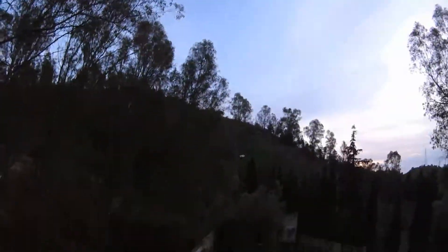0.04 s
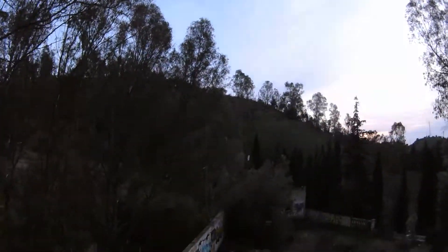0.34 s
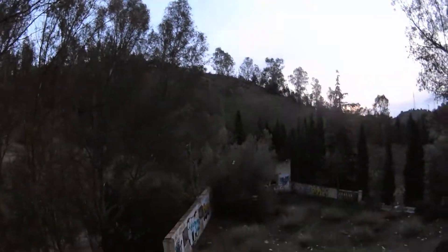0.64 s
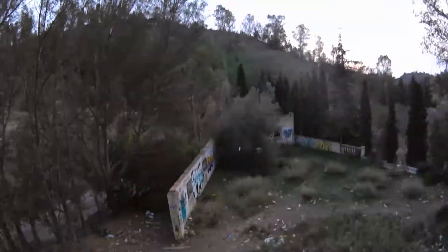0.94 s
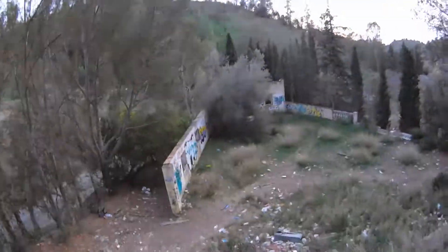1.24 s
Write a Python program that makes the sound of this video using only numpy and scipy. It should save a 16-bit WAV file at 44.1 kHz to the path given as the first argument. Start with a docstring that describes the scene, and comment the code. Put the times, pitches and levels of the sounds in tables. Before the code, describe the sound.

Three thrown glass bottles smash against masonry in a clearing among trees, roughly two seconds apart. Each hit is sharp, short and close enough to overload the microphone, with a quick slap off a far wall and a brief wash from the trees. Pieces thud to the ground, then faint knocks, clinks and gritty crunches follow. Light wind buffets the microphone over a distant hush.

```python
"""Three thrown bottles smash on masonry in a clearing, close enough to overload the microphone.
Each impact excites the modes of the glass and a swarm of fractures, then a bright burst of splinters;
a far wall returns a slap and the trees scatter a short wash. Pieces thud, knock and clink, and grit
crunches. Light wind buffets the microphone over a distant hush, a faint hum and rustling leaves,
and a far bird whistles once near the end."""
import sys
import numpy as np
from scipy import signal
from scipy.fft import rfft, irfft
from scipy.io import wavfile
from scipy.ndimage import uniform_filter1d

SR = 44100
rng = np.random.default_rng(int(sys.argv[2]) if len(sys.argv) > 2 else 0)


def to_wav(sig):
    """Store sig (one row per channel, or 1-D mono) as 16-bit WAV at the path in sys.argv[1].

    Samples outside -1..1 are clipped; the rate is SR.
    """
    pcm = np.clip(np.atleast_2d(sig), -1, 1) * 32767
    pcm = np.round(pcm).astype(np.int16)
    wavfile.write(sys.argv[1], SR, pcm.T)  # frames by channels


N = 282240

# Spectra of the distant hush, the wind and the leaves. Each row: frequency in Hz, level in dB.
HUSH_SPECTRUM = [(30, -13), (70, -7), (110, -3.5), (160, -5.5), (250, -10), (400, -3.5), (620, -4),
                 (920, -2), (1350, -9.5), (2000, -20), (3000, -29), (8000, -42), (10000, -59.5)]
WIND_SPECTRUM = [(12, 10.5), (30, -3), (60, -9), (110, -12.5), (170, -19), (300, -25), (800, -61.5)]
LEAF_SPECTRUM = [(300, -17), (1000, 1), (1800, 7), (2600, -4), (4000, -12), (7500, -15), (9500, -34.5)]
# Slow drift of the hush. Each row: time in seconds, gain in dB.
HUSH_DRIFT = [(0, 4.5), (1.35, 4.5), (2.1, 1), (3.5, 1), (4.9, 2.5), (6.0, -3.5), (6.4, -3)]
# Air bumping the microphone. Each row: centre in seconds, level in dB, width in seconds.
AIR_BUMPS = [(2.234, -14, 0.0017), (2.633, -31.5, 0.0055), (3.159, -22, 0.0023), (3.313, -28.5, 0.0049),
             (4.2500, -16, .0048), (4.549, -25, 0.0034), (4.70, -29, 0.0037)]
# Leaves stirring. Each row: start in seconds, level in dB, time to the peak in seconds.
LEAF_STIRS = [(0.0, -56.5, .1), (0.55, -65.5, .14), (1.72, -60, .08), (2.921, -73, .2), (5.62, -73.5, .06)]
# Modes of each bottle. Each row: frequency in Hz, damping in Hz, level in dB.
FIRST_MODES = [(183, 20, 0), (355, 30, -4), (474, 32, -1), (715, 38, -1), (985, 40, -5), (1205, 55, -2),
               (1530, 55, -9), (3200, 64, -17)]
SECOND_MODES = [(253, 70, -1), (355, 30, -2), (684, 50, -1), (899, 70, -3), (1200, 25, -6), (1610, 84, -10),
                (2590, 150, -18)]
THIRD_MODES = [(690, 26, 0), (807, 25, -4), (988, 24, 0), (1235, 35, -5), (1385, 35, -7), (1920, 70, -7),
               (2970, 42, -10)]
# Bottles hitting masonry. Each row: start in seconds, ring level, crack level, bass and treble in dB,
# T60 of the crack in seconds, level of the accompanying gust in dB.
IMPACTS = [(0.0833, -5, -3.5, 3.5, -2, .07, -29.5), (2.2536, -8.5, -2.5, 5, 0.5, 0.058, -24),
           (4.2149, -3.5, 2.5, -4.5, -4, .055, -25.5)]
# Glass splintering. Each row: start in seconds, level, bass and treble in dB, T60 in seconds.
SPLINTER_BURSTS = [(0.1070, -4.5, 8, -1, 0.038), (0.1105, -3.5, -0.5, 3.5, 0.026),
                   (2.2623, -8, 3, -1.5, 0.057), (2.2780, -9.5, -1.5, -4, 0.046),
                   (4.2295, -7, -9, .5, .044), (4.2372, -3.5, -5, 16.5, 0.01)]
# Spectra of breaking glass, blows on the ground and grit. Each row: frequency in Hz, level in dB.
CRACK_SPECTRUM = [(40, -17), (120, 0), (300, -1.5), (750, -1), (1200, -6.5), (1900, -12), (3500, -18.5),
                  (7000, -25.5), (9000, -44.5)]
BLOW_SPECTRUM = [(40, -16), (130, -0.5), (350, 3), (650, -2), (1100, -8.5), (1800, -23.5), (3500, -36),
                 (8000, -40.5)]
GRIT_SPECTRUM = [(100, -14.5), (400, -6.5), (700, 3.5), (1100, -3.5), (1600, -1.5), (2100, -2.5),
                 (3000, -9.5), (4500, -14.5), (7500, -23.5), (9000, -23.5)]
# Low booms of pieces landing. Each row: start in seconds, level in dB, frequency in Hz, T60 in seconds.
LANDING_THUDS = [(0.1120, -17, 160, .15), (0.1400, -19, 178, .22), (2.3330, -9, 350, .09),
                 (2.3430, -8, 185, .11), (2.3600, -8, 134, .13), (4.4265, -14.5, 172, .1)]
# Heavy pieces striking the ground. Each row: start in seconds, level and bass in dB, T60 in seconds.
GROUND_BLOWS = [(0.1180, -15, 3, 0.21), (2.2894, -12.5, -2, 0.12), (2.3327, -5, 6, 0.037),
                (2.339, -10.5, 9.5, 0.086), (2.3560, -11, 17, 0.049), (4.2440, -14.5, 9, 0.04),
                (4.261, -22, 5, 0.29)]
# Colour of the scatter from the trees. Each row: frequency in Hz, level in dB.
SCATTER_SPECTRUM = [(60, -9.5), (200, -2.5), (450, 3), (900, 3.5), (2000, -0.5), (4000, -2.5), (8000, -4.5)]
# Decay of that scatter. Each row: frequency in Hz, T60 in seconds.
SCATTER_DECAY = [(100, 0.8), (400, .55), (1000, .55), (3000, 0.62), (8000, 0.56)]
# Slaps from the far wall. Each row: arrival in seconds, peak level in dB.
WALL_ECHOES = [(0.1577, -5.5), (2.3245, -10), (4.2810, -4.5)]
# Grit and shards crunching. Each row: start in seconds, level and treble in dB, T60 in seconds.
GRIT_CRUNCHES = [(0.3772, -42.5, -5, 0.093), (0.401, -28.5, -3.5, 0.047), (0.4460, -41.5, -4, 0.13),
                 (0.787, -46, -13, 0.14), (0.8870, -41, -16, 0.041), (1.517, -49.5, -6.5, 0.12),
                 (1.7080, -40, 1, 0.089), (1.7270, -33.5, -2.5, 0.036), (2.453, -34, -15.5, 0.04),
                 (3.0093, -50, -1, 0.049), (3.2410, -53, -18, 0.054), (3.556, -35.5, -8.5, .1),
                 (3.6205, -39.5, -3, .02), (3.704, -46, -0.5, .11), (4.0895, -35, -6.5, .033),
                 (4.113, -44.5, 2, 0.037), (4.466, -38.5, -20, .05), (5.091, -51.5, -5, 0.07)]
# Hollow knocks. Each row: start in seconds, level in dB, pitch factor.
HOLLOW_KNOCKS = [(0.3774, -28.5, 1.08), (0.4318, -35, 0.92), (0.788, -36.5, 1.135), (0.836, -40, 0.82),
                 (0.8880, -41.5, 0.73), (4.561, -37.5, 1.15), (4.6100, -40.5, 0.84)]
# Modes of a hollow piece. Each row: frequency in Hz at pitch factor 1, level in dB, T60 in seconds.
HOLLOW_MODES = [(268, 2.5, 0.13), (370.7, 6.5, 0.15), (560, 3.5, 0.096), (845, -7, 0.08),
                (1026, -3.5, 0.11)]
# Small pieces ringing. Each row: start in seconds, level in dB, frequency in Hz.
SHARD_CLINKS = [(1.5570, -41, 2086), (1.6260, -48, 2070), (1.7300, -37, 634), (2.8830, -40, 577),
                (3.2440, -39, 1534), (3.5550, -33.5, 2750), (3.5600, -30.5, 771), (4.614, -40, 1517)]

TIME = np.arange(N) / SR


def amp(db):
    """Decibels to amplitude ratio."""
    return 10 ** (np.asarray(db) / 20)


def unit_rms(x):
    """Normalisation to an rms of 1."""
    return x / np.sqrt(np.mean(x ** 2) + 1e-20)


def curve_at(points, hz):
    """Interpolation on a logarithmic frequency axis."""
    freqs, values = np.transpose(points)
    return np.interp(np.log(hz + 1), np.log(freqs + 1), values)


def add(mix, start_s, sound):
    """Superposition: a sound sums into the mix from its start time."""
    part = mix[max(round(start_s * SR), 0):][:len(sound)]
    part += sound[:len(part)]


def decay(t, t60):
    """Exponential damping: the level falls 60 dB in t60 seconds."""
    return np.exp(-np.log(1000) * t / t60)


def click(spectrum, bass_db=0, treble_db=0, size=4096):
    """A minimum-phase pulse of unit energy, its spectrum tilted by bass and treble shelves."""
    hz = np.fft.rfftfreq(size, 1 / SR)
    db = curve_at(spectrum, hz) + bass_db / (1 + (hz / 400) ** 2)
    db += treble_db * hz ** 2 / (hz ** 2 + 2200 ** 2)
    cepstrum = irfft(np.log(amp(db)))
    cepstrum[1:size // 2] *= 2  # folding the cepstrum makes the pulse causal
    cepstrum[size // 2 + 1:] = 0
    pulse = irfft(np.exp(rfft(cepstrum)))
    return pulse / np.linalg.norm(pulse)


def burst(t60, grain_db, rise_s=0.00005, size=16384):
    """Many tiny fractures of uneven size sum to decaying noise, whitened to a flat spectrum."""
    t = np.arange(size) / SR
    envelope = decay(t, t60) * (1 - np.exp(-t / rise_s))
    fractures = rng.standard_normal(size) * amp(grain_db * np.minimum(rng.exponential(1, size), 4))
    spectrum = rfft(fractures * envelope)
    smooth_power = uniform_filter1d(abs(spectrum) ** 2, size=90)
    swarm = irfft(spectrum / np.sqrt(smooth_power + 1e-12))[:size // 2]
    return swarm * np.linalg.norm(envelope) / np.linalg.norm(swarm) / envelope.max()


def mode(hz, t60, rise_s, size=22050):
    """Free vibration of one mode: a damped sinusoid."""
    t = np.arange(size) / SR
    return np.sin(2 * np.pi * hz * t) * decay(t, t60) * (1 - np.exp(-t / rise_s))


def noise(spectrum):
    """Stationary filtered noise of rms 1."""
    gain = amp(curve_at(spectrum, np.fft.rfftfreq(N, 1 / SR)))
    return unit_rms(irfft(rfft(rng.standard_normal(N)) * gain, N))


def wander(rate_hz):
    """Slow random modulation: low-passed noise of rms 1."""
    return noise([(rate_hz / 2, 0), (rate_hz, -6), (rate_hz * 4, -90)])


def lowpass(x, hz):
    """Band limiting by a steep linear-phase filter."""
    return signal.oaconvolve(x, signal.firwin(181, hz, window=("kaiser", 8), fs=SR), "same")


def saturate(x, ceiling):
    """Overload: the response is linear up to a narrow knee, then flat."""
    return x / (1 + (x / ceiling) ** 20) ** (1 / 20)


def background(hush_db=-56.5, hum_hz=109, hum_db=-64.5, hiss_db=-72.5):
    """The noise floor: an amplitude-modulated hush, a far wavering hum and microphone self-noise."""
    drift_db = np.interp(TIME, *np.transpose(HUSH_DRIFT))
    hush = noise(HUSH_SPECTRUM) * amp(hush_db + drift_db + 0.51 * wander(rate_hz=13))
    hz = hum_hz * (1 + 0.024 * wander(rate_hz=3.6))
    hum = amp(hum_db) * unit_rms(np.sin(2 * np.pi * np.cumsum(hz) / SR))
    return hush + hum + amp(hiss_db) * rng.standard_normal(N)


def wind(calm_db=-40, calm_db_per_s=-0.6, lag_s=0.027, rise_s=0.097, fall_s=0.17):
    """Turbulent pressure on the microphone: a fading bed and gusts add in power, with brief bumps."""
    power = amp(calm_db + calm_db_per_s * TIME) ** 2
    power += amp(-33.5) ** 2 * np.exp(-((TIME - 3.137) / 0.13) ** 2)  # a lone gust between throws
    for start, *_, gust_db in IMPACTS:  # a gust swells around each smash
        since = TIME - start - lag_s
        power += (amp(gust_db) * np.exp(-np.maximum(since / fall_s, -since / rise_s))) ** 2
    out = noise(WIND_SPECTRUM) * np.sqrt(power)
    for centre, db, width in AIR_BUMPS:
        offset = (TIME - centre) / width
        out -= amp(db) * 2 * offset * np.exp(-offset ** 2)  # a push, then a pull
    return out


def leaves(rest_db=-76):
    """Dry leaves are incoherent sources, so stirs add in power; each swells fast and settles slowly."""
    power = np.full(N, amp(rest_db) ** 2)
    for start, db, peak_s in LEAF_STIRS:
        age = np.maximum(TIME - start, 0) / peak_s
        power += (amp(db) * age * np.exp(1 - age)) ** 2
    return noise(LEAF_SPECTRUM) * np.sqrt(power) * amp(1.8 * wander(rate_hz=35))


def crack(db, bass_db, treble_db, t60):
    """Brittle fracture: a swarm of pulses with the spectrum of breaking glass."""
    swarm = burst(t60, grain_db=-1.5)
    return amp(db) * signal.fftconvolve(swarm, click(CRACK_SPECTRUM, bass_db, treble_db))


def bottles():
    """Impact excitation: each bottle cracks and rings in its damped modes, then splinters."""
    out = np.zeros(N)
    for impact, modes in zip(IMPACTS, (FIRST_MODES, SECOND_MODES, THIRD_MODES)):
        start, ring_db, crack_db, bass_db, treble_db, t60, _ = impact
        for k, (hz, damping_hz, mode_db) in enumerate(modes):
            tone = mode(hz, t60=2.4 / (damping_hz + 15), rise_s=0.0005)
            add(out, start, (-1) ** k * amp(ring_db + mode_db) * tone)
        add(out, start, crack(crack_db, bass_db, treble_db, t60))
    for start, db, bass_db, treble_db, t60 in SPLINTER_BURSTS:
        add(out, start, crack(db, bass_db, treble_db, t60))
    return out


def clearing(x, build_s=0.01):
    """Reverberation: scatter from trunks and ground builds up, then decays at each band's own rate."""
    hz, t, bands = signal.stft(rng.standard_normal(SR), SR, nperseg=256)
    envelope = decay(t, curve_at(SCATTER_DECAY, hz)[:, None]) * (1 - np.exp(-t / build_s))
    bands *= amp(curve_at(SCATTER_SPECTRUM, hz))[:, None] * envelope
    response = signal.istft(bands, SR, nperseg=256)[1]
    response /= np.linalg.norm(response)
    add(response, 0, amp(-50.5) * mode(hz=724, t60=0.4, rise_s=0.06))  # one tone lingers
    return signal.fftconvolve(x, response)[:N]


def landings():
    """Inelastic impact: heavy pieces hit the ground with dull noise bursts and low damped booms."""
    out = np.zeros(N)
    for start, db, bass_db, t60 in GROUND_BLOWS:
        blow = signal.fftconvolve(burst(t60, grain_db=2), click(BLOW_SPECTRUM, bass_db))
        add(out, start, amp(db) * blow)
    for start, db, hz, t60 in LANDING_THUDS:
        add(out, start, amp(db) * mode(hz, t60, rise_s=0.00072))
    return out


def wall_slaps():
    """Reflection: a dulled pulse stands for the front of each smash returning from the far wall."""
    out = np.zeros(N)
    front = click([(100, -16.5), (500, -3), (1500, 1.5), (2600, -8), (4000, -19.5), (8000, -33.5)])
    for arrival, db in WALL_ECHOES:
        add(out, arrival, -amp(db) * front / abs(front).max())
    return out


def grit(trickle_db=-19, trickle_t60=0.35, grains_per_s=60):
    """Granular noise: grit gives way in a crunch, then loose grains trickle on at random times."""
    out = np.zeros(N)
    t = np.arange(SR // 2) / SR
    grain = burst(t60=0.012, grain_db=2)
    for start, db, treble_db, t60 in GRIT_CRUNCHES:
        colour = click(GRIT_SPECTRUM, treble_db=treble_db)
        crunch = burst(t60, grain_db=5.5, rise_s=t60 ** 2)  # long crunches swell, short ones snap
        add(out, start, amp(db) * signal.fftconvolve(crunch, colour))
        ticks = (rng.random(len(t)) < grains_per_s / SR) * rng.standard_normal(len(t))
        trickle = signal.fftconvolve(ticks * decay(t, trickle_t60), grain)
        add(out, start, amp(db + trickle_db) * signal.fftconvolve(trickle, colour))
    return out


def knocks():
    """Resonance of hollow pieces: one set of modes, scaled in pitch for each knock."""
    out = np.zeros(N)
    for start, db, pitch in HOLLOW_KNOCKS:
        for hz, mode_db, t60 in HOLLOW_MODES:
            add(out, start, amp(db + mode_db) * mode(hz * pitch, t60, rise_s=0.0029))
    return out


def clinks():
    """Amplitude modulation: a small piece rattles while it rings in a single mode."""
    out = np.zeros(N)
    for start, db, hz in SHARD_CLINKS:
        tone = mode(hz, t60=0.072, rise_s=0.0031)
        rattle = unit_rms(uniform_filter1d(rng.standard_normal(len(tone)), size=130))
        add(out, start, amp(db) * tone * (1 + rattle) / np.sqrt(2))
    return out


def snap(start_s=2.2311, peak_db=-5):
    """A single pressure pulse, heard as a dry snap just before the second smash."""
    out = np.zeros(N)
    pulse = click([(60, -1), (400, 0), (1500, -5), (3500, -19), (8000, -37)])
    add(out, start_s, amp(peak_db) * pulse / abs(pulse).max())
    return out


def bird(start_s=5.63, length_s=0.17, pitch_hz=2490, peak_db=-71):
    """Frequency modulation: a far bird's short whistle wavers about one pitch."""
    out, size = np.zeros(N), int(length_s * SR)
    hz = pitch_hz * (1 + 0.012 * wander(rate_hz=30)[:size])
    add(out, start_s, amp(peak_db) * np.hanning(size) * np.sin(2 * np.pi * np.cumsum(hz) / SR))
    return out


def scene():
    """Direct sound, reflections and the outdoor background superpose in one channel."""
    glass = bottles()
    pieces = landings() + knocks() + clinks() + grit()
    reflections = wall_slaps() + clearing(amp(-18.5) * glass + amp(-17) * pieces)
    return (glass + pieces + snap() + reflections + background() + wind() + leaves() + bird())[None]


def record(dry):
    """Nonlinear distortion: the microphone overloads and is band-limited, then limits at full scale."""
    overloaded = lowpass(saturate(dry[0], ceiling=1.15), hz=8150)
    return lowpass(saturate(overloaded, ceiling=1), hz=16000)[None]


dry = scene()
out = record(dry)
to_wav(out)
```